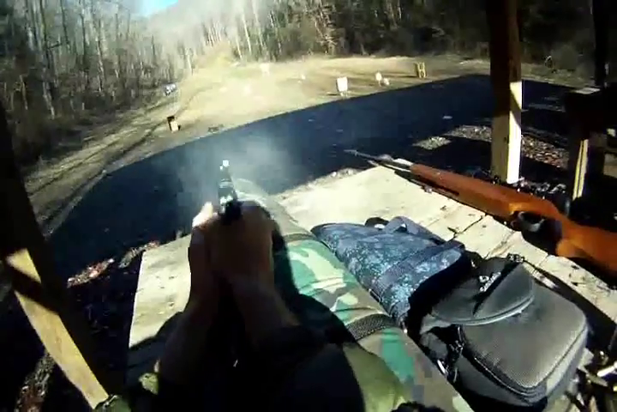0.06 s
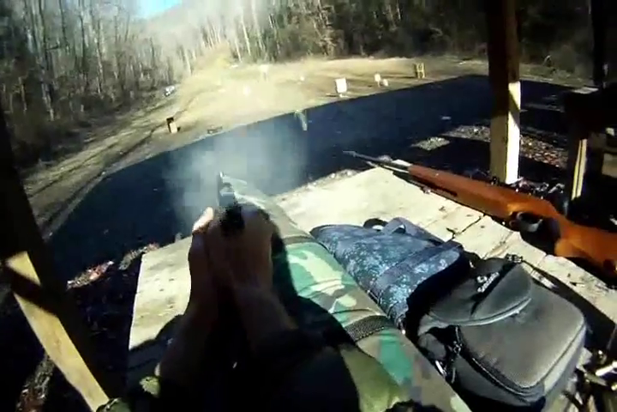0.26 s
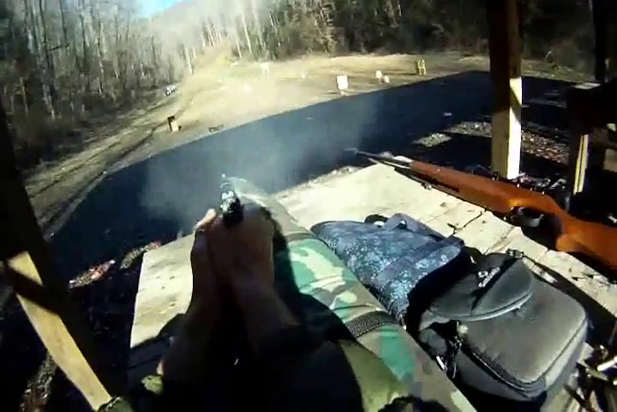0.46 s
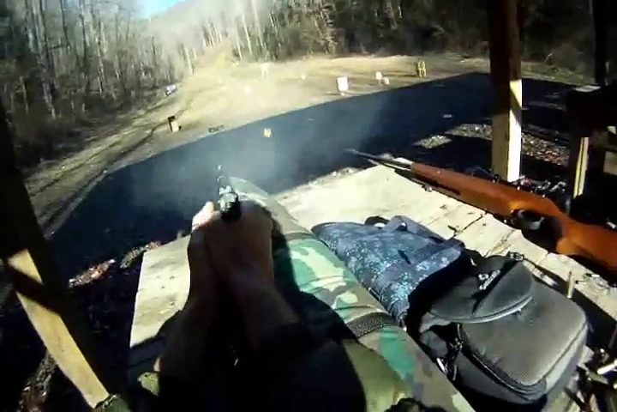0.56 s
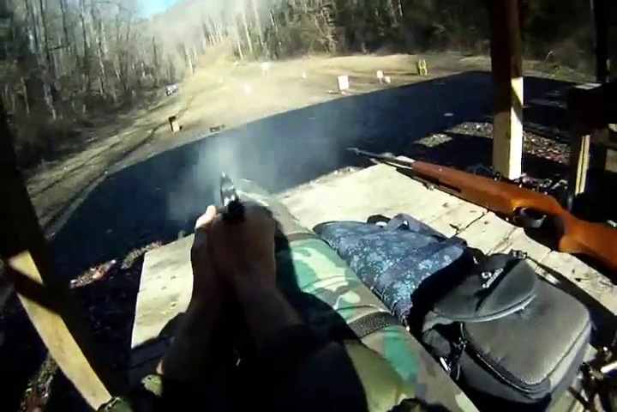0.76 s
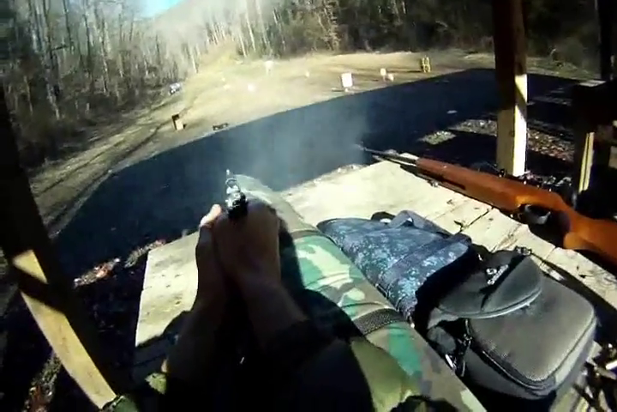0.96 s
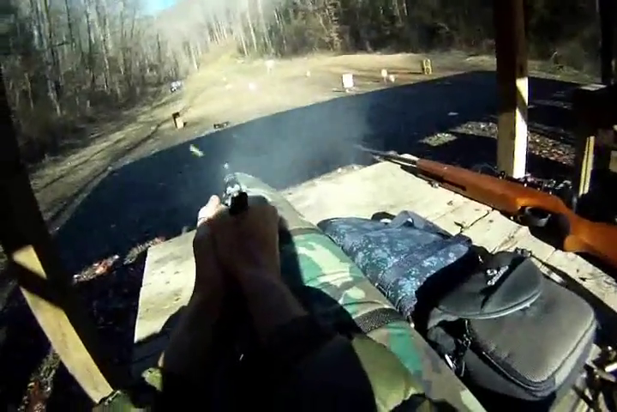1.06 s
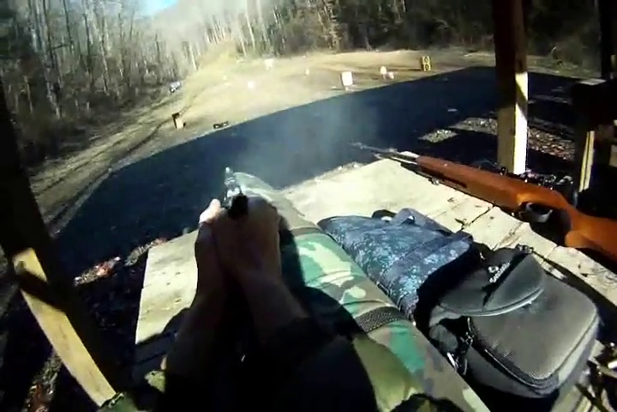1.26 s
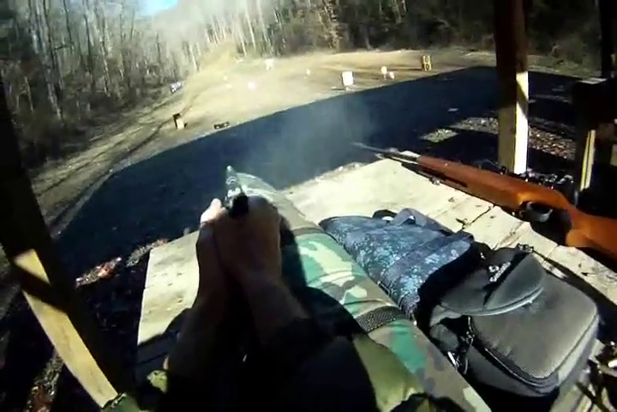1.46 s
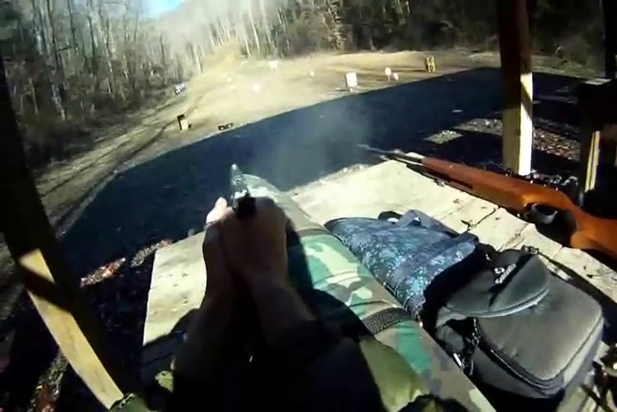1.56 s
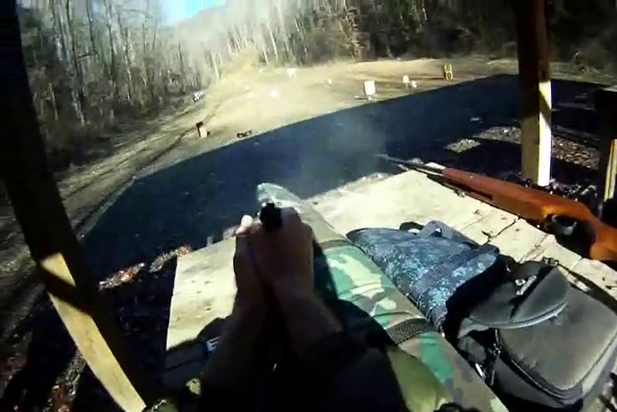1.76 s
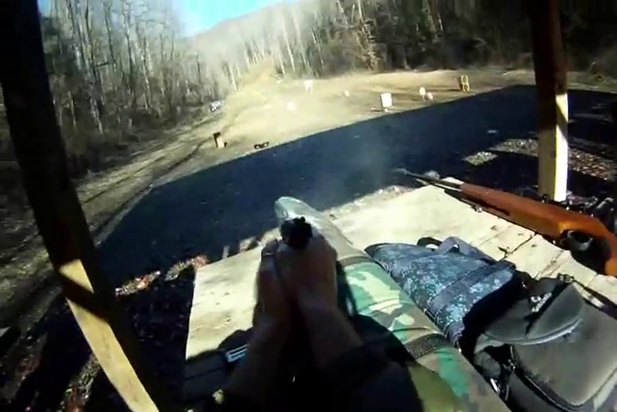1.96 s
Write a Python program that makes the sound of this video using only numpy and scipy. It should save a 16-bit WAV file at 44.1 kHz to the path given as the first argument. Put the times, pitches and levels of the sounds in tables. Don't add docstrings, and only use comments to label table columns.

```python
import sys
import numpy as np
from scipy import signal
from scipy.fft import rfft, irfft, next_fast_len
from scipy.io import wavfile
from scipy.ndimage import uniform_filter1d, map_coordinates

SR = 44100
rng = np.random.default_rng(int(sys.argv[2]) if len(sys.argv) > 2 else 0)


def boost_factor(decibels):
    exponent = np.asarray(decibels, float) / 20
    return 10 ** exponent


def generate_wav(sig):
    pcm = np.round(np.clip(np.atleast_2d(sig).T, -1, 1) * 32767).astype(np.int16)
    wavfile.write(sys.argv[1], SR, pcm)


N = 88200
BLAST_HOLD_S = .0059


def unit(x):
    return x / np.sqrt(np.mean(x ** 2) + 1e-20)


def along(points, hz):
    f, value = np.transpose(points)
    return np.interp(np.log(hz + 1), np.log(f + 1), value)


def causal(x, gain):
    m = 2 * next_fast_len(x.shape[-1] // 2 + 4096)
    log_gain = np.log(np.maximum(gain(np.fft.rfftfreq(m, 1 / SR)), 1e-6))
    cepstrum = irfft(log_gain, m)
    cepstrum[1:m // 2] *= 2
    cepstrum[m // 2 + 1:] = 0
    return irfft(rfft(x, m) * np.exp(rfft(cepstrum)), m)[..., :x.shape[-1]]


def fading(noise, t60s):
    hz, t, z = signal.stft(noise, SR, nperseg=128)
    decay = boost_factor(-60 * t / along(t60s, hz)[:, None])
    return signal.istft(z * decay, SR, nperseg=128)[1][:len(noise)]


def burst(t, t60):
    return (t >= 0) * boost_factor(-60 * np.maximum(t, 0) / t60)


def decaying_tones(t, tones):
    return sum(boost_factor(db) * burst(t - s, t60) * np.sin(2 * np.pi * hz * (t - s)) for s, hz, db, t60 in tones)


# frequency in Hz, level in dB.
WIND = [(20, -7), (70, -7), (150, -16.5), (400, -41.5)]
# frequency in Hz, level in dB.
HISS = [(100, -9), (300, -1.5), (800, -3.5), (2200, 2.5), (4000, -16.5), (5900, -28.5)]


def air():
    t = np.arange(N) / SR
    gusts = map_coordinates(rng.standard_normal(40), [t * 8.92])
    duck_db, duck_s = -22, .15
    ducks = [duck_db * (t > s) * np.exp(-((t - s) / duck_s) ** 2) for s, *_ in SHOTS]
    wind = unit(causal(rng.standard_normal(N), lambda hz: boost_factor(along(WIND, hz))))
    hiss = unit(causal(rng.standard_normal(N), lambda hz: boost_factor(along(HISS, hz))))
    return boost_factor(-57 + 5 * gusts + np.min(ducks, axis=0)) * wind + boost_factor(-52.5) * hiss


# frequency in Hz, t60 in seconds.
WOODS = [(200, 0.71), (700, 1.75), (2200, 1.563), (4000, 1.194), (5800, 1.23)]
# frequency in Hz, level in dB.
WOODS_TILT = [(200, 4.5), (700, 1), (2200, 3), (5500, -4.5)]
# first echo in seconds, swell in seconds, level in dB.
TREELINES = [
    (0.091, 0.067, -16),
    (0.133, 0.041, -3),
    (0.184, 0.01, -2),
]


def woods(t, noise):
    swell = np.sqrt(sum((boost_factor(db) * np.clip((t - s) / rise, 0, 1)) ** 2 for s, rise, db in TREELINES))
    echo = np.roll(fading(noise, WOODS), np.argmax(t > 0))
    return causal(swell * echo, lambda hz: boost_factor(along(WOODS_TILT, hz) - 24))


# delay in seconds, pitch in Hz, level in dB.
BANKS = [
    (.2775, 450, -29),
    (.2975, 600, -29),
]


def bank_slaps(t):
    return decaying_tones(t, [(s, hz, db, .009) for s, hz, db in BANKS])


# frequency in Hz, t60 in seconds.
SHELTER = [(200, 0.02), (700, 0.058), (1500, 0.16), (2200, .24), (3000, 0.12), (5500, 0.15)]


def shelter(t, noise):
    return boost_factor(-12.5) * np.roll(fading(noise, SHELTER), np.argmax(t > 0)) * (t > 0)


# delay in seconds, level in dB, t60 in seconds.
BOUNCES = [
    (.0065, -29, .02),
    (.0095, -3.5, 0.025),
    (0.014, -16.5, 0.017),
    (0.024, -23.5, 0.083),
    (0.045, -30, 0.02),
    (.068, -45, .05),
]


def bounces(t):
    return np.sqrt(sum((boost_factor(db) * burst(t - s, t60)) ** 2 for s, db, t60 in BOUNCES))


def bench_shake(t):
    low = causal(rng.standard_normal(len(t)), lambda hz: 1 / (1 + (hz / 50.6) ** 4))
    squeeze_s, width_s = .03, .03
    return boost_factor(-39) * unit(low) * np.exp(-((t + squeeze_s) / width_s) ** 2)


def blast_envelope(t):
    rise_s, end_t60 = .0004, .004
    return np.clip(t / rise_s, 0, 1) * np.where(t < BLAST_HOLD_S, 1, burst(t - BLAST_HOLD_S, end_t60))


def direct_sound(t):
    hammer = boost_factor(-27) * burst(t + .0055, .02)
    lead_in = boost_factor(-25) * np.exp(-np.abs(t) / .0013)
    return blast_envelope(t) + hammer + lead_in


def low_swing(t):
    push, pull, pull_s = 1.0, .18, .0026
    u = np.maximum(t - BLAST_HOLD_S, 0) / pull_s
    return -push * np.sin(np.pi * np.clip(t / BLAST_HOLD_S, 0, 1)) + pull * u * np.exp(1 - u)


# frequency in Hz, level in dB.
CASE = [(60, -25.5), (300, -22.5), (900, -12.5), (2000, -5), (2800, -17.5), (3800, -7.5), (4600, -12.5),
        (5900, -22)]
# frequency in Hz, width in Hz, level in dB.
CASE_PEAKS = [(620, 50, -11), (916, 29, -7.5), (1206, 85, -7), (1467, 23, -11), (1910, 127, -1),
              (2325, 410, -0.5), (3130, 150, -3), (3550, 180, 1), (5110, 470, -8.5)]


def case(x):
    def gain(hz):
        peaks = sum(boost_factor(2 * db) / (1 + (2 * (hz - centre) / width) ** 2) for centre, width, db in CASE_PEAKS)
        return np.sqrt(boost_factor(2 * along(CASE, hz)) + peaks)

    return causal(x, gain) / np.sqrt(np.mean(gain(np.fft.rfftfreq(8192, 1 / SR)) ** 2))


# frequency in Hz, level in dB, t60 in seconds.
RING = [(514.8, -3, 0.022), (950, -12.5, 0.038), (1375.7, -1, 0.024), (1526.8, -0.5, 0.052),
        (1835, -9, 0.039), (2313.3, -2, 0.069), (2635, -0.5, 0.021), (3045.7, -2.5, 0.047),
        (3708, -1.5, 0.019), (4863, -5, 0.021)]


def box_ring(t, phases, spread_db):
    modes = sum(boost_factor(db + spread) * burst(t, t60) * np.sin(2 * np.pi * hz * t + phase)
                for (hz, db, t60), phase, spread in zip(RING, phases, spread_db))
    return boost_factor(8.5) * blast_envelope(t) * modes


# delay in seconds, frequency in Hz, level in dB, t60 in seconds.
AFTER = [
    (.0058, 2250, -9, .03),
    (.0092, 1900, -2, .022),
    (.0095, 3400, -5, .014),
    (.0155, 2000, -10, .015),
    (.021, 2150, -15, .025),
    (.0275, 2050, -19, .015),
    (.0425, 2200, -24, .12),
    (.01, 135, -50, .7),
    (.01, 280, -43, .3),
]


def after_ring(t):
    return decaying_tones(t, AFTER)


def answer(t, noise, phases, spread_db):
    near = (direct_sound(t) + bounces(t)) * noise[0]
    airborne = near + shelter(t, noise[1]) + woods(t, noise[2])
    return case(airborne) + box_ring(t, phases, spread_db) + after_ring(t)


# start in seconds, strength in dB, low-frequency swing in dB.
SHOTS = [
    (-.262, -4.5, 0),
    (-.0215, -3, 0.5),
    (0.2122, -2.5, -3),
    (0.4502, -3.5, -5.5),
    (0.6978, -3, -8.5),
    (0.939, -3, -6),
    (1.1765, -2, -6),
]


def pistol():
    lead_s, tail_s = .4, 2.4
    t = np.arange(round(tail_s * SR)) / SR - .12
    shared = rng.standard_normal((3, len(t)))
    phases = rng.uniform(0, 2 * np.pi, len(RING))
    same = .85
    swing, slaps = low_swing(t), bank_slaps(t)
    out = np.zeros(N + round((lead_s + tail_s) * SR))
    for s, db, swing_db in SHOTS:
        noise = np.sqrt(same) * shared + np.sqrt(1 - same) * rng.standard_normal(shared.shape)
        shot_phases = phases + rng.normal(0, .3, len(RING))
        spread_db = rng.normal(0, 1.3, len(RING))
        sound = answer(t, noise, shot_phases, spread_db) + slaps + bench_shake(t)
        start = round((s + t[0] + lead_s) * SR)
        out[start:][:len(t)] += boost_factor(db) * sound + boost_factor(swing_db) * swing
    return out[round(lead_s * SR):][:N]


def scene():
    return (air() + pistol())[None]


def roll_off(x):
    return signal.sosfilt(signal.butter(12, 16250, fs=SR, output="sos"), x)


def record(dry):
    top, knee = .93, 10
    x = dry / (1 + np.abs(dry / top) ** knee) ** (1 / knee)
    edge_hz, edge_steep = 5900, 51
    x = causal(x, lambda hz: 1 / np.sqrt(1 + (hz / edge_hz) ** (2 * edge_steep)))
    sampling_hz, playback_hz = 12000, 48000
    x = signal.resample_poly(x, sampling_hz // 300, SR // 300, axis=1, window=("kaiser", 1.))
    x = np.repeat(x, playback_hz // sampling_hz, axis=1)
    x = signal.resample_poly(x, SR // 300, playback_hz // 300, axis=1)[:, :N]
    hz = np.fft.rfftfreq(N, 1 / SR)
    cut_hz, cut_steep = 15350, 60
    z = rfft(x) / (1 + (hz / cut_hz) ** (2 * cut_steep))
    gap_hz, gap_wide_hz, gap_opens_db = 11950, 650, -15
    gap = irfft(z / (1 + ((hz - gap_hz) / gap_wide_hz) ** 20), N)
    is_quiet = uniform_filter1d(x ** 2, 700) < boost_factor(2 * gap_opens_db)
    quiet = uniform_filter1d(1. * is_quiet, 256)
    return roll_off(np.clip(irfft(z, N) - quiet * gap, -1, 1))


dry = scene()
out = record(dry)
generate_wav(out)
```